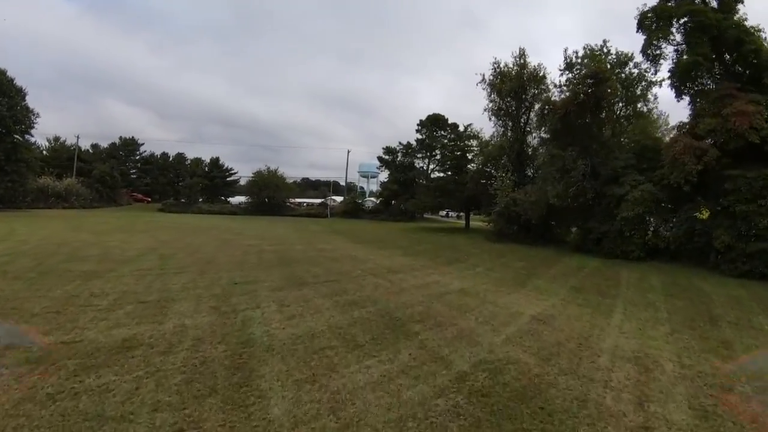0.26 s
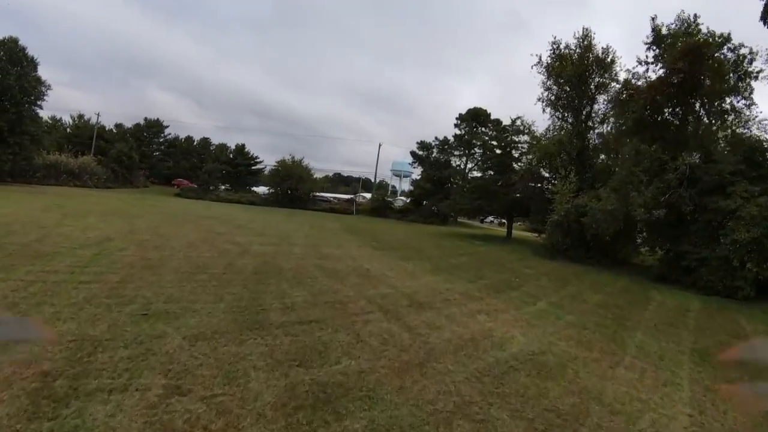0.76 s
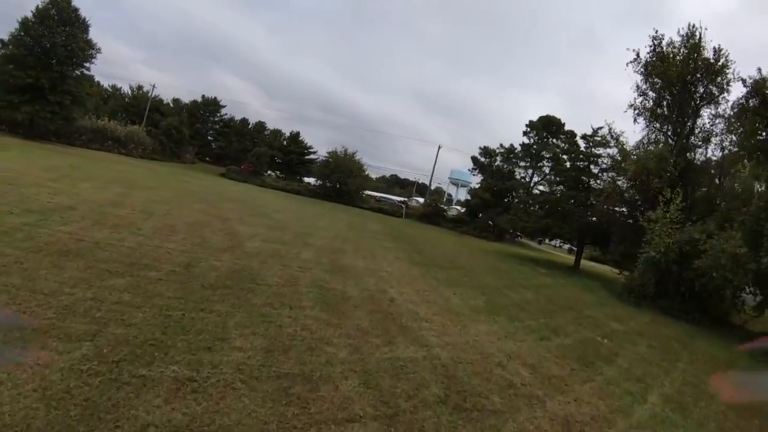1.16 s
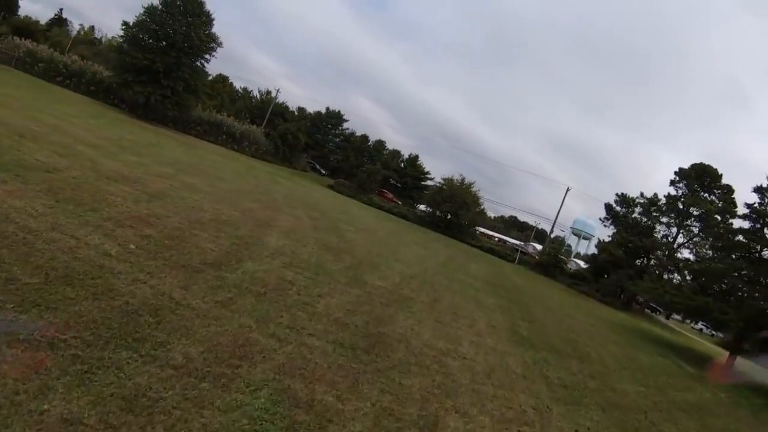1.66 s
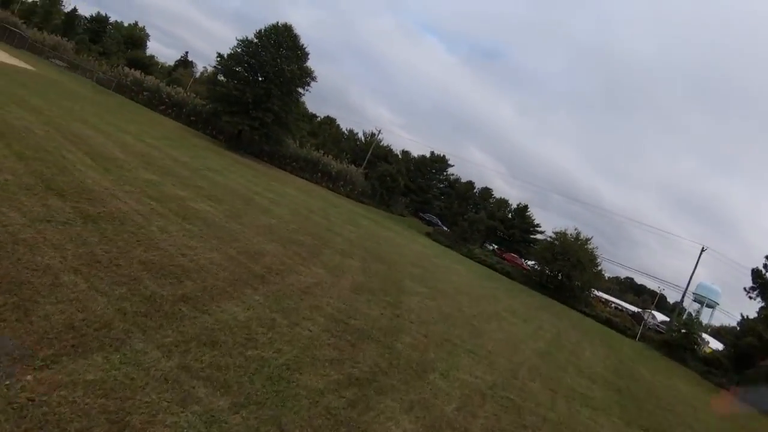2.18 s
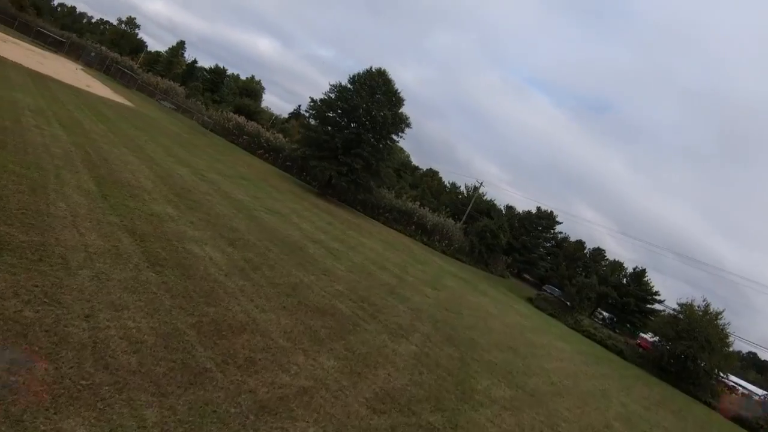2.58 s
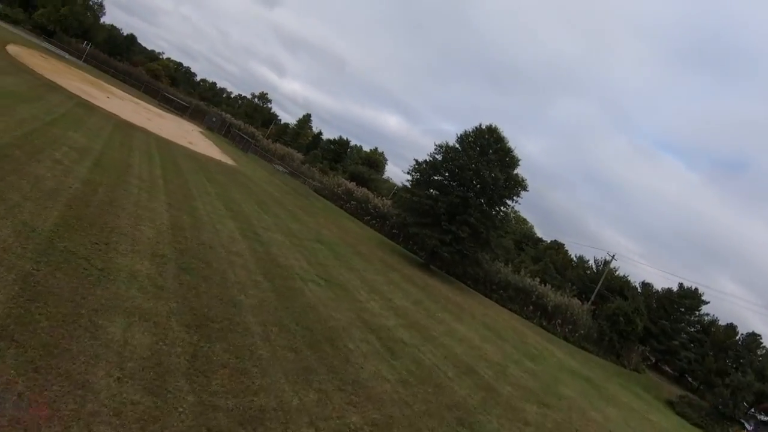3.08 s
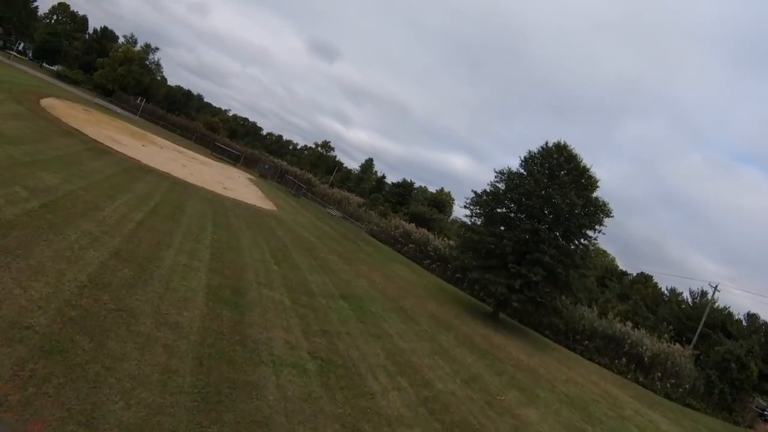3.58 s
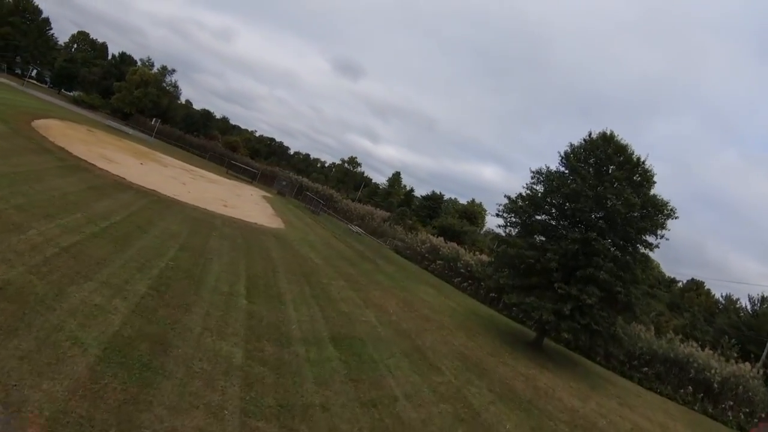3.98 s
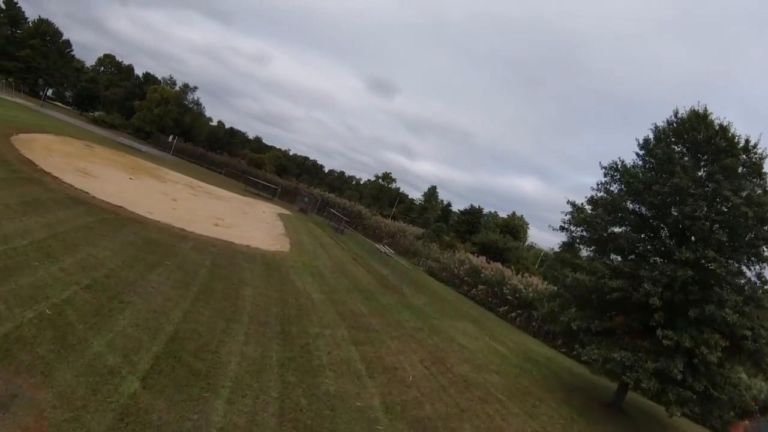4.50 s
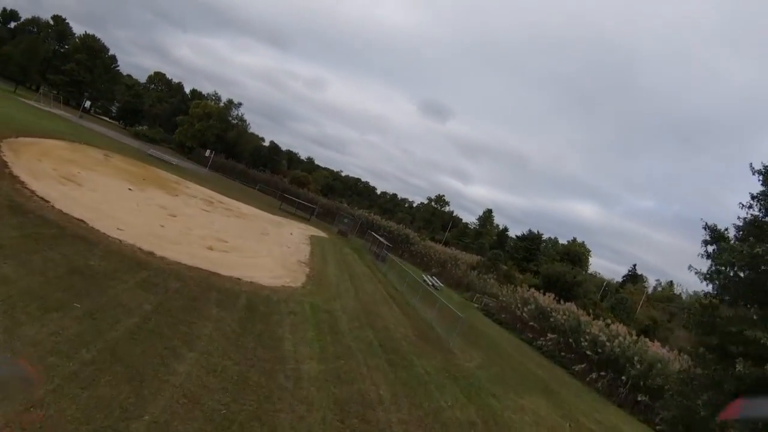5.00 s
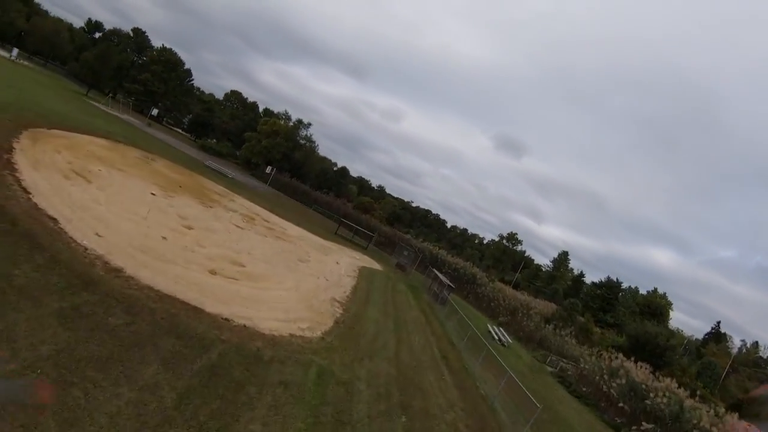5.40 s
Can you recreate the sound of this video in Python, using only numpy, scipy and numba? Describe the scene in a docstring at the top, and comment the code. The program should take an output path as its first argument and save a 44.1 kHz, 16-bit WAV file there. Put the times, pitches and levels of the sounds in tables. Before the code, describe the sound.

A small four-rotor drone is already flying when the sound begins and keeps flying to the end, about 5.6 seconds, over an open field. The stereo microphone rides on it, close and muffled, with little high treble. Four blade tones around 450 to 650 hertz beat into a rough, nasal buzz, with octaves and thinner motor whine above. Rushing air, low buffeting and a hollow blown resonance, stronger at left, surround them. The pitch sags near 0.8 seconds, then jumps at about 1.4 as the craft banks, the tones spreading apart. A soft low thump falls near 1.1, a fainter one at 2.5. Pitch wavers upward to a peak around 3.3, drops abruptly at 3.6 and recovers quickly. A thin fluttering whistle glides up and back at 4.0 to 4.4. The buzz sinks towards 4.9 while buffeting grows, then climbs again unevenly until the cut.

```python
"""Four-rotor drone in flight

A small drone heard by the muffled stereo camera that rides on it. Each three-blade rotor sings at its
own blade rate and beats with its neighbours; the fourteen magnets of each motor whine above. Coloured
noise makes the air over the blades and ports, resonances make the blown left port, a sine glide makes
a thin whistle, and short pressure cycles make two thumps."""
import sys
import numpy as np
from scipy import signal
from scipy.fft import rfft, irfft, next_fast_len
from scipy.io import wavfile
from scipy.ndimage import uniform_filter1d
from numba import njit

SR = 44100
rng = np.random.default_rng(int(sys.argv[2]) if len(sys.argv) > 2 else 0)


def transcribe(u):
    """Save the signal u as a 16-bit wav file named by the first command-line argument.

    u: samples, shape (n,) or (channels, n), limited to [-1, 1]; the rate is SR.
    q: integer samples, one column per channel.
    """
    v = np.clip(np.atleast_2d(u).T, -1, 1)
    q = np.round(v * 32767).astype(np.int16)
    wavfile.write(sys.argv[1], SR, q)


N = 249165


def undb(db):
    """Decibels to amplitude."""
    return 10 ** (np.asarray(db) / 20)


def curves(table):
    """Every column after the time, one value a sample."""
    at_s, *columns = np.transpose(table)
    t = np.arange(N) / SR
    return [np.interp(t, at_s, column) for column in columns]


def walk(rate):
    """Random levels held 1 / rate seconds, then smoothed twice into slopes; standard deviation 1."""
    hold = int(SR / rate)
    steps = np.repeat(rng.standard_normal(N // hold + 1), hold)
    x = uniform_filter1d(uniform_filter1d(steps, hold), hold)[:N]
    return x / x.std()


def tone(angle, db, pan_db, lead, flutter):
    """One partial at both ports; its size and timing flutter as the blades cut uneven air."""
    wobble = 1 + flutter * (walk(60.) + 1j * walk(60.))
    partial = np.sqrt(2) * np.exp(1j * angle) * wobble  # rms 1 before the wobble
    left = undb(db + pan_db / 2) * (partial * np.exp(1j * lead / 2)).real
    right = undb(db - pan_db / 2) * (partial * np.exp(-1j * lead / 2)).real
    return np.array([left, right])


def flight_rates():
    """Blade rate of each rotor in Hz: the four flight controls added or subtracted by the mixer."""
    # flight controls, as shares of the blade rate: at_s [s], share_hz [Hz]
    throttle = [(0.0, 527.0), (0.26, 510.6), (0.42, 525.6), (0.64, 525.7), (0.75, 501), (0.86, 494.9),
                (1.04, 509), (1.28, 517.2), (1.32, 531.2), (1.37, 569.9), (1.4, 585.0), (1.42, 585.8),
                (1.5, 569.4), (1.56, 584.5), (1.64, 591.3), (1.72, 571.9), (1.79, 566.8), (1.96, 576.4),
                (2.04, 593.6), (2.16, 576), (2.4, 596.6), (2.58, 570.8), (2.96, 602.3), (3.04, 592.5),
                (3.16, 617.7), (3.32, 631), (3.5, 608.3), (3.62, 532.4), (3.66, 540.7), (3.76, 602.5),
                (3.92, 595), (4.06, 611), (4.24, 609), (4.5, 589.4), (4.68, 569.8), (4.82, 542.0),
                (4.92, 530.6), (5.26, 559.7), (5.42, 582.5), (5.5, 560.6), (5.54, 564.5), (5.65, 591.5)]
    pitch = [(0.0, 56.4), (0.19, 57.02), (0.36, 51.5), (0.5, 57.64), (0.56, 42.96), (0.64, 56.2),
             (0.75, 62.0), (1.37, 55.4), (1.4, 64.0), (1.42, 59.4), (1.49, 63.3), (1.56, 57.4),
             (1.64, 69.5), (1.85, 59.5), (1.9, 62.4), (1.96, 49.8), (2.06, 58.5), (2.22, 53.1),
             (2.58, 56.9), (2.7, 51.33), (3.02, 51.34), (3.24, 43.06), (3.5, 45.27), (3.66, 36.95),
             (3.8, 44.92), (4.5, 49.57), (4.62, 47.6), (4.82, 54.7), (5.26, 53.1), (5.46, 61.4),
             (5.52, 53.8), (5.65, 57.8)]
    roll = [(0.0, 6.2), (0.19, 1.8), (0.26, 7.2), (0.38, 4.4), (0.49, 9.4), (0.749, 0.9), (0.86, 5.9),
            (1.37, 12.1), (1.42, 23.3), (1.5, 28.6), (1.561, 38.1), (1.74, 34.8), (1.78, 22.6),
            (1.84, 28.7), (1.9, 16.2), (1.99, 34.3), (2.05, 33.5), (2.26, 36.7), (2.401, 45.0), (2.5, 40.3),
            (3.04, 36.9), (3.4, 29.7), (3.57, 31.3), (3.63, 22.9), (4.1, 21.7), (4.151, 16.6), (4.7, 13.5),
            (5.0, 8.9), (5.24, 19.3), (5.38, 21.6), (5.52, 28.9), (5.65, 29.8)]
    yaw = [(0.0, -7.5), (0.189, 4), (0.33, -3), (0.56, -1.76), (1.1, 3.5), (1.16, 1.3), (1.3, 3.8),
           (1.37, -3.1), (1.42, -13.6), (1.6, -27.9), (1.65, -22.3), (1.72, -24.0), (1.84, -5), (1.9, -6.9),
           (1.99, -18.7), (2.18, -27.5), (2.54, -21.5), (2.84, -24.5), (3.18, -34.5), (3.4, -29),
           (3.761, -26), (3.82, -28.0), (3.96, -25.6), (4.32, -14), (4.7, -8.7), (4.78, -11.0), (4.92, 0.6),
           (5.04, 3.5), (5.24, -7.0), (5.36, -15.5), (5.44, -17.5), (5.65, -32)]
    # one row each for the slow, swinging, quick and top rotor:
    # throttle_sign, pitch_sign, roll_sign, yaw_sign [+1 or -1]
    mixer = [(1, -1, -1, 1), (1, -1, 1, -1), (1, 1, -1, -1), (1, 1, 1, 1)]
    controls = np.array([curves(control)[0] for control in (throttle, pitch, roll, yaw)])
    return np.array(mixer) @ controls


def rotors(stir, load_db):
    """Four rotors at slightly different speeds, so their close tones beat."""
    # strong tones against speed, before load and wander: blade_hz [Hz], blade_db [dB],
    # blade_pan_db [dB, left minus right], octave_db [dB], magnet_db [dB]
    slow_tones = [(420, -43.5, -1.5, -46.5, -60.5), (453, -45.5, -0.5, -44.5, -58.5),
                  (480, -45, -.5, -43.5, -56.5), (495, -43.5, -2, -46.5, -54.5), (517, -43, 0, -45, -64.5)]
    swing_tones = [(433, -50, -1, -49, -52), (474, -53, -3, -53.5, -46.5), (500, -49, -1, -57.5, -48),
                   (543.8, -48, 3.5, -43.5, -58.5), (590.5, -45, 2, -36.5, -59.5),
                   (599.8, -45, 3, -42, -54), (645, -44.5, 1.5, -41, -56.5)]
    quick_tones = [(544, -52, -4.5, -63, -56.5), (610, -45.5, -7, -66, -55), (619, -45, -6.5, -51, -51.5),
                   (633, -45, -7.5, -56.5, -60), (675, -40.5, -9.5, -52, -64)]
    top_tones = [(590, -57, 30, -59.5, -55), (590, -49, 8.9, -55.5, -51), (623, -47.5, 7, -56.5, -51),
                 (653, -43, 7.9, -56.5, -55), (664, -41, 5.2, -56.5, -59)]
    # weak tones, one list a rotor: turns [multiple of shaft rate], left_db [dB], right_db [dB]
    weak_tones = [
        [(7, -61.5, -60.5), (9, -51.5, -53), (11, -62.5, -65), (12, -61, -60), (13, -60, -61.5), (15, -66, -66),
         (18, -68, -67)],
        [(5, -67, -65), (9, -53.5, -56), (10, -63.5, -69), (11, -62.5, -59.5), (12, -59, -65.5),
         (13, -64.5, -64), (15, -65, -66)],
        [(4, -67, -59.5), (5, -57.5, -62.5), (7, -57, -62.5), (8, -58, -67.5), (9, -54.5, -61), (10, -63, -62),
         (11, -60, -67.5), (12, -63.5, -61.5), (13, -61, -58.5)],
        [(5, -61, -60.5), (7, -59.5, -63), (8, -56, -71.5), (9, -57, -65), (10, -59, -63), (11, -58.5, -60.5),
         (12, -66, -68), (13, -59, -60)],
    ]
    # stereo placing of each rotor: blade_lead [rad], octave_side, magnet_side, weak_lead [rad];
    # sides are pairs of pan_db [dB, left minus right], lead [rad]; a positive lead puts left ahead
    port_sides = [(-0.14, (-1.5, -0.092), (0., 0.79), -0.06), (0.55, (0.69, 0.18), (-7.5, 2.2), 1.6),
                  (-0.39, (-7.5, 0.36), (-3, -1.6), 1.8), (0.3, (3.9, .3), (-2.9, -2.06), 1.5)]
    # strength of the switching whine, one value a motor: motor_db [dB]
    motor_levels = [0.5, -9.5, 3, 1]
    strong_tones = slow_tones, swing_tones, quick_tones, top_tones
    settings = zip(flight_rates(), strong_tones, weak_tones, port_sides, motor_levels)
    return sum(rotor(*setting, stir, load_db) for setting in settings)


def rotor(blade_hz, tones, weak, sides, motor_db, stir, load_db):
    """Blade tone, octave, magnet tone, weak shaft multiples and switching whine locked to one shaft."""
    # switching whine as it leaks through the housing: whine_hz [Hz], level_db [dB, before motor_db]
    whine_curve = [(5900, -125), (6500, -92.5), (7100, -102), (7500, -118), (8100, -89), (8700, -102),
                   (9300, -102), (9700, -125)]
    blades, magnets = 3, 14
    hunt_hz, hunt_per_s = 1., 20.  # small wavering of the blade rate
    wander_db, wander_per_s = .6, 3.  # slow drift of the tone levels

    def wander():
        """Slow random level drift in dB."""
        return wander_db * walk(wander_per_s)

    shaft_hz = (blade_hz + hunt_hz * walk(hunt_per_s)) / blades
    shaft = 2 * np.pi * np.cumsum(shaft_hz) / SR
    speed_hz, *columns = np.transpose(tones)
    blade_db, blade_pan_db, octave_db, magnet_db = (np.interp(blade_hz, speed_hz, c) for c in columns)
    blade_lead, octave_side, magnet_side, weak_lead = sides

    out = tone(blades * shaft, blade_db + load_db + wander(), blade_pan_db, blade_lead, 0.45 * stir)
    # each blade passage is a dip of pressure, so the octave stands against the tone
    out -= tone(2 * blades * shaft, octave_db + load_db + wander(), *octave_side, 0.54 * stir)
    out += tone(magnets * shaft, magnet_db + 3 * wander(), *magnet_side, 1.2 * stir)
    for turns, left_db, right_db in weak:
        angle = round(turns) * shaft + 2 * np.pi * rng.random()
        out += tone(angle, (left_db + right_db) / 2, left_db - right_db, weak_lead, 0.69 * stir)

    # the switching whine sits at three times the magnet tone
    leak_db = np.interp(3 * magnets * shaft_hz, *np.transpose(whine_curve))
    whine_db = motor_db + leak_db + 2.4 * walk(12.0)
    return out + tone(3 * magnets * shaft, whine_db, -5.0, 1.5, 0.19)


def air(buffet_db, rush_db, port_db):
    """Low buffeting, rush of the blades, the resounding left port and a trace of treble hiss."""
    # noise colours, relative levels: band_hz [Hz], left_db [dB], right_db [dB],
    # likeness [0-1, of the two ports], lead [rad, left ahead]
    buffet_colour = [(20.7, -8, -15, 0.69, 0), (55, -2, -1.5, 0.86, -0.026), (165, -0.5, -2, 0.44, -0.11),
                     (292, -10, -12.5, 0.8, 0.076), (590, -20.5, -18.5, 0.45, -0.022),
                     (1490, -51.5, -49.5, .5, 0)]
    rush_colour = [(375, 1.5, 0, 0.5, 0.5), (590, 0.5, 3, 0.93, 1), (770, 1.5, 0, 0.3, -1),
                   (1210, 4, 10.5, 0.4, 3.5), (1450, 4, -3, 0, 0.5), (1830, 7, -0.5, 0, -1.5),
                   (2390, 7, 6, 0.8, -1.05), (2520, -1.5, -6.5, 0.1, 1), (2780, -3.5, 0, 0, 2.5),
                   (2970, 1, 0, 0.8, 4), (3202, -7, -7, 0.2, 1.5), (3580, -16.5, -19.5, 0, 0.5),
                   (4040, -53.5, -40, .3, 6), (4270, -60, -59.5, .3, -5)]  # behind the housing
    leak_colour = [(4970, -32, -29.5, .3, 0.0016), (5700, -12.5, -5, .3, 0.014),
                   (6200, -32.5, -22.5, .3, 0.0062), (6600, -3, 4.5, 0.24, 0.0073),
                   (7600, -26.5, -20.5, .3, 0.0048), (7700, -5, -1.5, .3, 0), (9300, -20.5, -14, .3, 0.012),
                   (9800, -33, -31, .3, 0.013)]
    buffet = colour(buffet_colour) * undb(buffet_db + 0.35 * walk(5.5))
    rush = colour(rush_colour) * undb(rush_db + 1.3 * walk(12.))
    hiss = colour(leak_colour) * undb(-95.5 + 1.2 * walk(3.))
    return buffet + rush + blown_port(port_db) + hiss


def colour(table):
    """Two-port noise of rms 1, shaped in the spectrum to the table's colour, likeness and lead."""
    size = next_fast_len(N)
    band_hz, *columns = np.transpose(table)
    log_hz = np.log(np.arange(size // 2 + 1) * SR / size + 1)
    left_db, right_db, likeness, lead = (np.interp(log_hz, np.log(band_hz), c) for c in columns)
    likeness = np.clip(likeness, 0, 1)
    shared, own = rfft(rng.standard_normal((2, size)))
    inside = (log_hz >= np.log(band_hz[0] / 2)) & (log_hz <= np.log(band_hz[-1]))
    left = shared * undb(left_db) * np.exp(1j * lead)
    right = (likeness * shared + np.sqrt(1 - likeness ** 2) * own) * undb(right_db)
    x = irfft(np.array([left, right]) * inside, size)[:, :N]
    return x / x.std()


def blown_port(port_db):
    """The left port resounds like a blown bottle, 12 dB weaker at the right; both modes drift together."""
    # resonances: centre_hz [Hz, before drift], width_hz [Hz], level_db [dB, relative]
    modes = [(1754, 110, -1), (1875, 340, -2)]
    drift = 1 + 0.019 * walk(8.2)
    port = sum(ring(hz * drift, width) * undb(db + 0.7 * walk(15.0)) for hz, width, db in modes)
    return port * undb(port_db + np.array([[0.], [-12.]]))


def ring(hz, width):
    """Noise of rms 1 through a steep resonance: two narrow band-passes and a wide one."""
    x = svf(rng.standard_normal(N), hz, width)
    x = svf(x, hz, width)
    x = svf(x, hz, 4 * width)
    return x / x.std()


@njit
def svf(x, hz, width):
    """State-variable band-pass with a moving centre, gain 1 there."""
    y, band, low = np.empty(len(x)), 0., 0.
    for i in range(len(x)):
        g, damping = np.tan(np.pi * hz[i] / SR), width / hz[i]
        v = (band + g * (x[i] - low)) / (1 + g * (g + damping))
        band = 2 * v - band
        low = low + 2 * g * v
        y[i] = damping * v
    return y


def whistle():
    """A thin, fluttering whistle in the airflow glides up and back, stronger at the left port."""
    # at_s [s], pitch_hz [Hz], level_db [dB, middle of the two ports]
    glide = [(4.03, 1800, -75), (4.07, 1870, -52), (4.17, 2300, -50), (4.21, 2150, -53), (4.28, 2350, -51),
             (4.34, 2000, -50), (4.37, 1870, -51), (4.43, 1820, -75)]
    pitch_hz, level_db = curves(glide)
    return tone(2 * np.pi * np.cumsum(pitch_hz) / SR, level_db, 4., 0., .35)


def thumps():
    """Gusts that thump on both ports alike, each about one slow cycle of pressure."""
    # start_s [s], envelope_db [dB, peak of the envelope], pitch_hz [Hz]
    gusts = [(1.069, -39.5, 64.6), (2.489, -44, 86.5)]
    t = np.arange(N) / SR
    out = np.zeros(N)
    for start_s, envelope_db, pitch_hz in gusts:
        swell = np.exp(-((t - start_s - .012) / 0.0087) ** 2)  # peaks 12 ms after start_s
        out += undb(envelope_db) * swell * np.sin(2 * np.pi * pitch_hz * (t - start_s))
    return out


def scene():
    """Four rotors in rushing air, with the whistle and the thumps."""
    # at_s [s], buffet_db [dB], rush_db [dB, blade rush], port_db [dB, port resonance],
    # stir [0-1, stirred inflow], load_db [dB, added to blade tones and octaves]
    air_levels = [(0, -53.5, -44, -44.5, 0.34, -1), (.4, -53.5, -46, -46.5, 0.44, 0.5),
                  (.8, -52.5, -43, -45, .35, 0), (1.15, -51.5, -43, -46, 0.52, -1.5),
                  (1.5, -50, -43, -46.5, 0.2, -0.5), (1.72, -48.5, -40.5, -51, .35, 0.5),
                  (1.9, -52, -45, -49, 0.29, 0), (2.3, -52.5, -42.5, -47.5, 0.1, -1),
                  (2.8, -52, -44, -47.5, 0.21, -0.5), (3.1, -54.5, -45.5, -48, .12, -1.5),
                  (3.32, -54, -45.5, -57, 0.16, 0), (3.42, -52.5, -45.5, -46.5, 0.22, -4.5),
                  (3.63, -51, -45.5, -64.5, 0.4, -3), (4.0, -53.5, -45, -48, .1, -2),
                  (4.4, -52.5, -46, -49, .1, -2), (4.9, -48.5, -43.5, -46, .3, 1),
                  (5.3, -48, -42.5, -48, 0.22, 0.5), (5.65, -49, -43, -48, .1, 0.5)]
    buffet_db, rush_db, port_db, stir, load_db = curves(air_levels)
    drone = rotors(np.clip(stir, 0, 1), load_db)
    return drone + air(buffet_db, rush_db, port_db) + whistle() + thumps()


def record(dry):
    """The housing passes the body of the sound and a thin band of treble; the converter hisses faintly."""
    body_hz, leak_hz, top_hz = 4100, 5200, 9600  # filter edges
    body_filter = signal.ellip(8, .2, 70, body_hz, fs=SR, output="sos")
    leak_filter = signal.ellip(8, .2, 90, leak_hz, "high", fs=SR, output="sos")
    top_filter = signal.ellip(8, .2, 70, top_hz, fs=SR, output="sos")
    housed = signal.sosfilt(body_filter, dry) + signal.sosfilt(leak_filter, dry)
    self_noise = undb(-103.5) * rng.standard_normal(dry.shape)
    return signal.sosfilt(top_filter, housed) + self_noise


dry = scene()
out = record(dry)
transcribe(out)
```